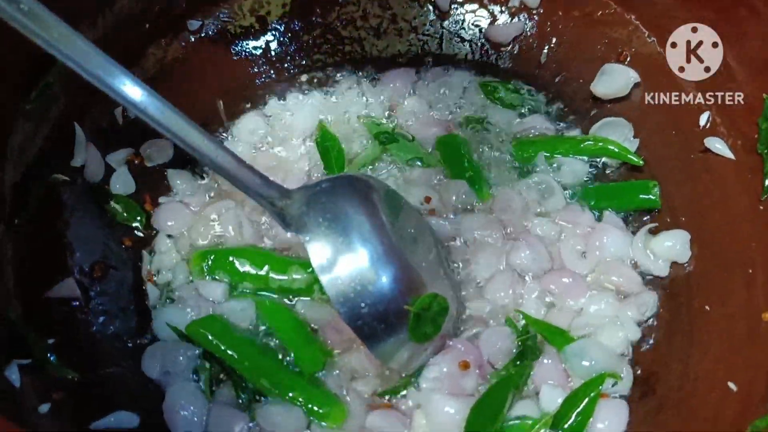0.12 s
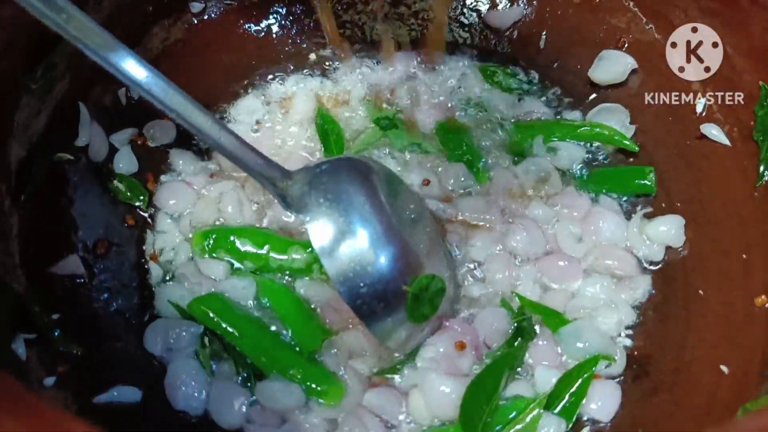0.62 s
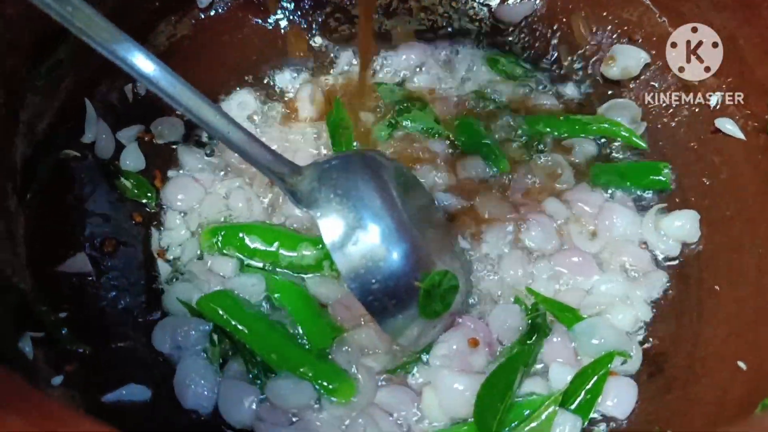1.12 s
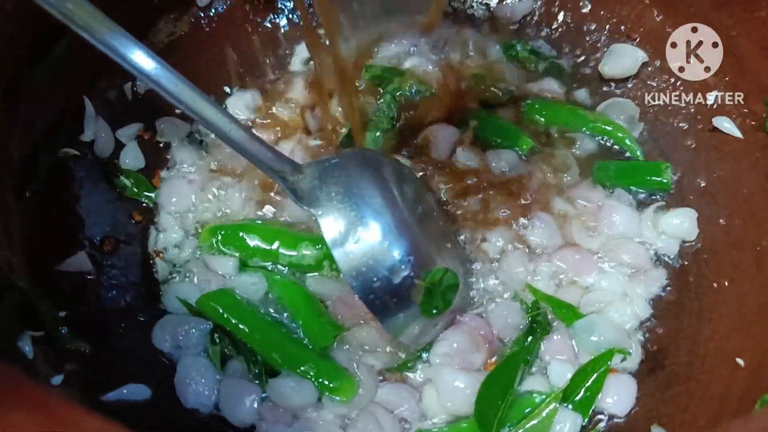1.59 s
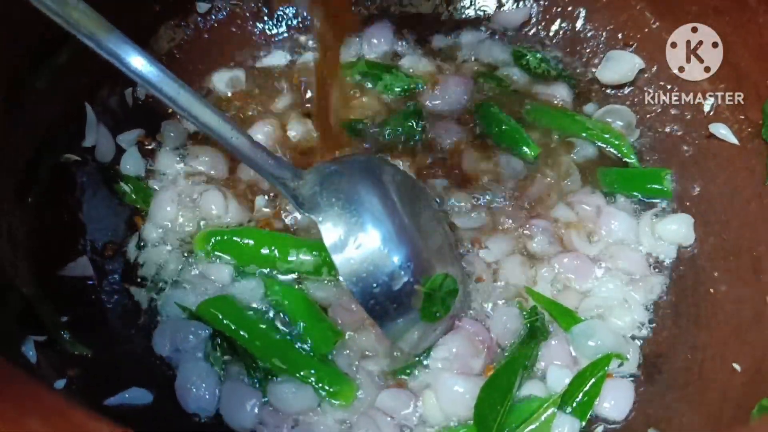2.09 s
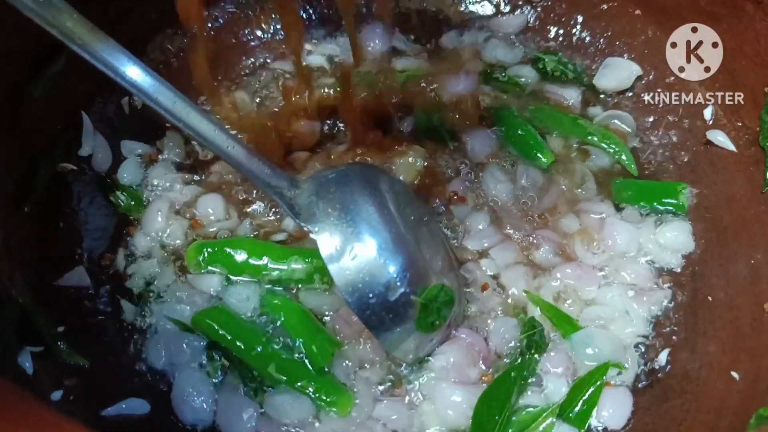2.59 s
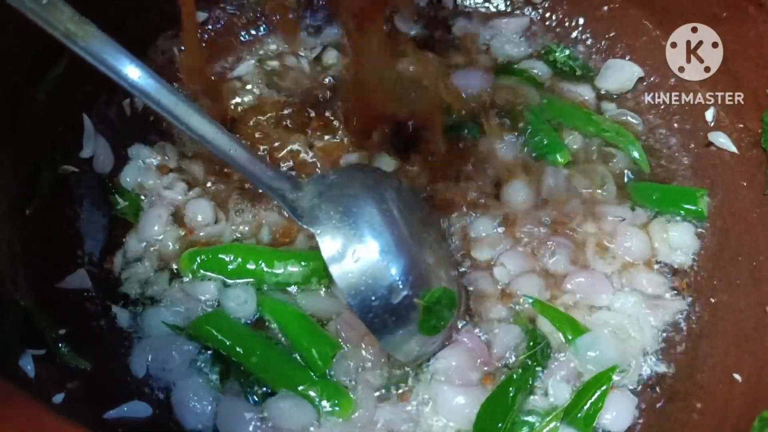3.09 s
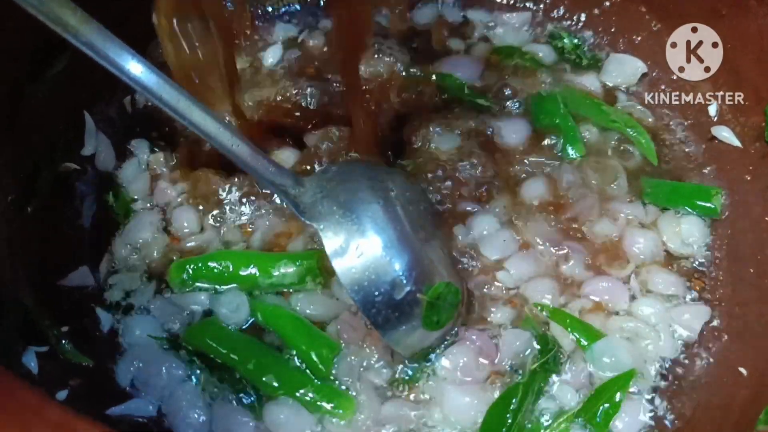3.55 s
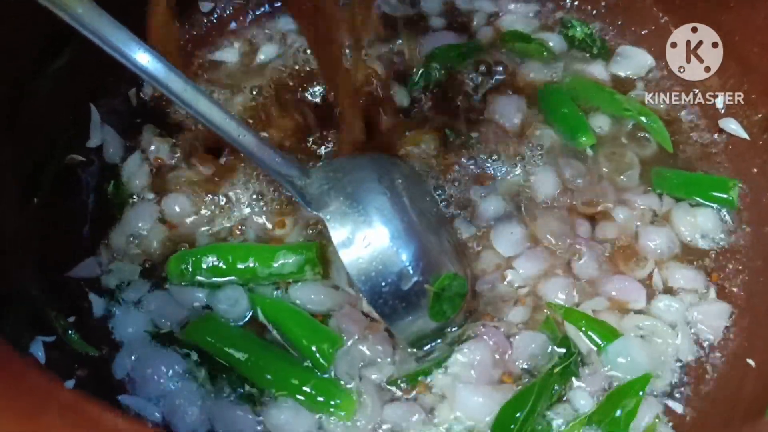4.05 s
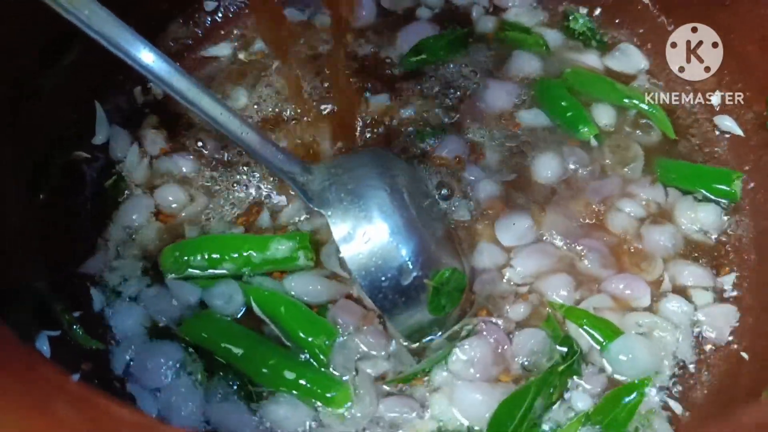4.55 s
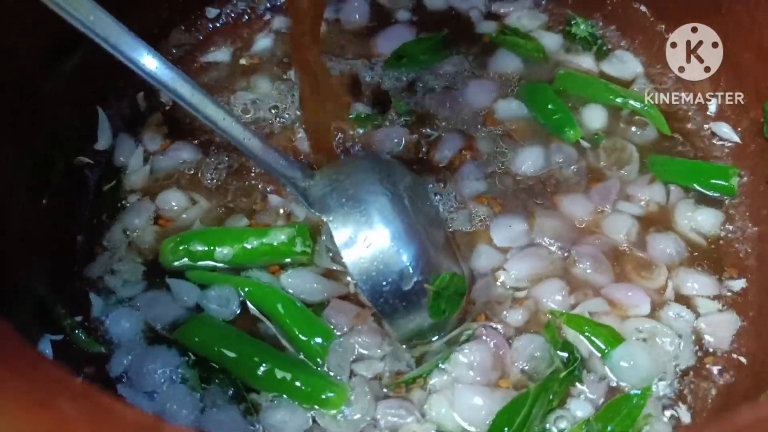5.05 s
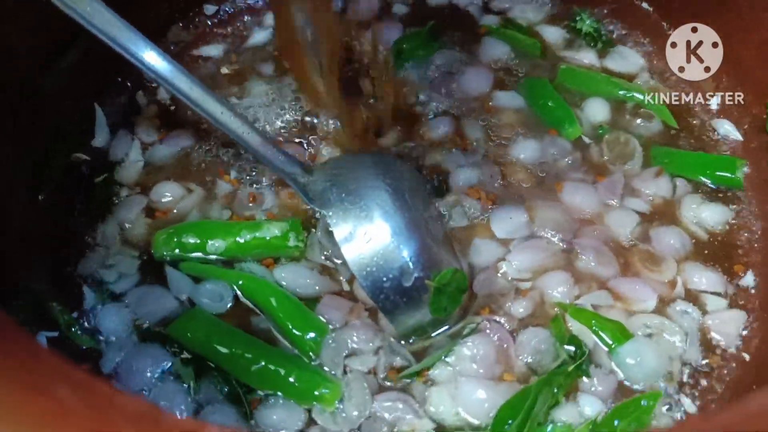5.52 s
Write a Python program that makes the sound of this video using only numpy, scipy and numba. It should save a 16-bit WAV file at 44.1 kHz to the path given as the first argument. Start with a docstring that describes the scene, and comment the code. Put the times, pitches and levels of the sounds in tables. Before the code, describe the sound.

Very close above a clay pot in a kitchen: a soft oil simmer ticks and crackles, then liquid hits the hot oil and flares into harsh, fluttering sizzle with snapping steam pops, many toward the left of no fixed spot but mostly right. Later, round bubbles plop with rising pitch inside the resonant pot. The crackle eases in the last second. Low room rumble with faint hums; phone sound, bright and slightly distorted on peaks.

```python
"""A soft simmer crackles, then juice is poured into hot oil with frying shallots in a clay pot.
Drops flash to steam: dense short grains crackle and spit, larger drops pop and puff, hiss fills in.
The air in the pot rings at its modes; as the pool deepens, big bubbles plop with a rising pitch.
A phone hears it just above the pot: each port adds its own treble resonances and loud bursts clip.
Under it all lies a room rumble with faint hums."""
import sys
import numpy as np
from scipy import signal
from scipy.fft import rfft, irfft, next_fast_len
from scipy.io import wavfile
from scipy.ndimage import uniform_filter1d
from numba import njit

SR = 44100
rng = np.random.default_rng(int(sys.argv[2]) if len(sys.argv) > 2 else 0)


def level_to_linear(level):
    """Convert decibel levels to linear amplitude factors, elementwise."""
    exponent = np.asarray(level, float) / 20
    return 10 ** exponent


def waveform_to_disk(signal):
    """Save audio, clipped to [-1, 1], as 16-bit WAV at the path in sys.argv[1]."""
    frames = np.transpose(np.atleast_2d(signal))
    scaled = np.clip(frames, -1, 1) * 32767
    samples = np.round(scaled).astype(np.int16)
    wavfile.write(sys.argv[1], SR, samples)


N = 249606

# Air modes of the pot. Each row: frequency in Hz, width in Hz, level in dB within its group of modes,
# left minus right in dB, likeness of the two ports from -1 to 1.
POT_MODES = [(490, 27, -4, 0, .98), (650, 60, -17, 0, .95), (1066, 72, -3.5, 1, .7),
             (1685, 45, -1.5, -4, -.4), (2050, 120, -11, 1, .1), (2295, 70, -2, -3, .3),
             (2690, 70, -10, 0, .5), (2875, 75, -3.5, -1, .2)]


def level(x, db):
    """Scale to an rms level in dB."""
    return x * level_to_linear(db) / np.sqrt(np.mean(x ** 2))


def walk(rate):
    """Random levels held for 1 / rate seconds and slewed twice; spread near 1."""
    hold = int(SR / rate)
    steps = np.repeat(rng.standard_normal(N // hold + 1), hold)
    slewed = uniform_filter1d(uniform_filter1d(steps, hold), hold)
    return 1.46 * slewed[:N]


def band(x, lo_hz, hi_hz):
    """Steep band-pass."""
    return signal.sosfilt(signal.butter(N=3, Wn=[lo_hz, hi_hz], btype="band", fs=SR, output="sos"), x)


@njit
def resonate(x, g, k):
    """State-variable band-pass loop; the centre may move every sample."""
    y, b, l = np.empty(len(x)), 0., 0.
    for i in range(len(x)):
        v = (b + g[i] * (x[i] + 1e-18 - l)) / (1 + g[i] * (g[i] + k))
        b, l, y[i] = 2 * v - b, l + 2 * g[i] * v, k * v
    return y


def svf(x, hz, width, shift=1.):
    """Resonance of gain 1 at its centre, which a factor near 1 may shift."""
    return resonate(x, np.tan(np.pi * hz / SR) * shift * np.ones(N), width / hz)


@njit
def grains(s, hz, cycles, size, rise, attack):
    """Each grain is a sine that swells, falls to 1/e in its cycles, and rises in pitch by a share meanwhile."""
    out = np.zeros(N)
    for k in range(len(s)):
        start, w = int(s[k] * SR), 2 * np.pi * hz[k] / SR
        span = cycles[k] * SR / hz[k]  # decay time in samples
        z, closed = size[k] * np.exp(1j * w * (start + 1 - s[k] * SR)), 1.
        p, glide = np.exp(1j * w - 1 / span), np.exp(1j * w * rise[k] / span)
        opening = np.exp(-1 / (attack * span))  # attack is a share of the decay time
        for i in range(max(start + 1, 0), min(start + int(6 * span) + 2, N)):
            closed *= opening
            out[i] += z.imag * (1 - closed)
            z, p = z * p, p * glide
    return out


def spatter(count, lo_hz, hi_hz, cycles, scatter_db, lag_ms, spread_ms, hiss_db):
    """Steam bubbles burst all over the pan: each has its own size, pitch, ring and path to either port."""
    t, pitch, strength, lag, side, ring = rng.random((count, 6)).T
    hz = lo_hz * (hi_hz / lo_hz) ** pitch
    turns = cycles * 6 ** (ring - .5)
    # a long ring spreads the same energy over more cycles
    size = level_to_linear(-scatter_db * np.log(1 - .999 * strength)) / np.sqrt(turns)
    lag_s = (lag_ms + spread_ms * (lag - .5)) / 1000
    heard = []
    for ear in (0, 1):  # left, then the lagging right
        ear_size = size * level_to_linear((ear - .5) * 13.0 * (side - .5))
        heard.append(grains(t * N / SR + ear * lag_s, hz, turns, ear_size, 0.024 + 0 * t, 0.35))
    # the countless smallest ones merge into hiss
    return level(np.array(heard), 0) + level_to_linear(hiss_db) * rng.standard_normal((2, N))


def ports(x):
    """The cavity behind each port rings at its resonances; the powers add and the response is causal."""
    # Each row: frequency in Hz, width in Hz, level in dB over the flat path.
    left_port = [(4000, 610, 3), (6480, 850, 7.5), (6800, 1560, 12), (10130, 1000, 5.5), (11850, 1200, 5)]
    right_port = [(3470, 650, 7.8), (4040, 285, 19.5), (4420, 710, 13.05), (5800, 480, 9.8),
                  (6260, 420, 18.5), (6680, 1770, 14.5), (7850, 740, 9.9)]
    hz, size, out = np.fft.rfftfreq(2048, 1 / SR), next_fast_len(N + 2048), []
    for v, table in zip(x, (left_port, right_port)):
        power = 1 + sum(level_to_linear(2 * db) / (1 + (2 * (hz - f) / w) ** 2) ** 1.42 for f, w, db in table)
        # folding the cepstrum gives the minimum-phase response
        cepstrum = irfft(np.log(power) / 2)
        fold = np.r_[cepstrum[0], 2 * cepstrum[1:1024], np.zeros(1024)]
        response = irfft(np.exp(rfft(fold)))
        out.append(irfft(rfft(v, size) * rfft(response, size), size)[:N])
    return np.array(out)


def sizzle(crackle_db, spit_db, pouring):
    """Crackle and fine spit flare up together as gouts of juice meet the oil."""
    # the flaring is weaker when no juice falls
    flare = (0.82 * walk(24.99) + 1.51 * walk(70)) * np.where(pouring, 1, 1 - 0.27)
    burst = ports(spatter(count=80000, lo_hz=3018, hi_hz=15590, cycles=4.8, scatter_db=3.5,
                          lag_ms=0.4677, spread_ms=0.14, hiss_db=-1.5))
    crackle = level(band(burst, 3160, 6840) * level_to_linear(flare), 2.66)
    # a gentle simmer makes only small bubbles, so the lower crackle is missing
    missing = 1 - level_to_linear(0.36 * np.clip(crackle_db + 23, -12, 0))
    lower = np.array([svf(v, 3900.0, 1200.0) for v in crackle])
    crackle = crackle - missing * lower
    spit = level(band(burst, 9130, 16700) * level_to_linear(0.55 * flare + 0.37 * walk(30)), 4.54)
    return level_to_linear(crackle_db) * crackle + level_to_linear(spit_db) * spit


def pops(crackle_db):
    """A larger drop explodes: a short ring and a broad tick, then a puff of steam hisses away."""
    # Loud steam pops. Each row: start in seconds, relative level in dB, pitch in Hz, left minus right in dB.
    loud_pops = [(0.062, -20, 6560, -7), (0.0835, -22, 4000, -17), (0.0886, -11, 6550, -8),
                 (0.156, -10.5, 6740, -5), (0.2209, -20.5, 5700, -15), (0.2898, -11, 6600, -19),
                 (0.3316, -14.5, 6700, -14), (0.455, -13.5, 6940, 5), (0.4754, -15, 7380, -10),
                 (0.4928, -13, 6700, -4), (0.6175, -23, 4930, -13), (0.65, -7.5, 6100, -6),
                 (0.7203, -18, 7900, 11), (0.8155, -6.5, 6440, -2), (0.834, -12, 5860, -12),
                 (0.8643, -4, 4280, -13), (0.9168, -8, 6430, -3), (0.9902, -11, 4280, -16),
                 (1.039, -6, 4100, -15), (1.0963, -2, 6800, -2), (1.182, -16, 3960, -17),
                 (1.2314, -2, 6430, -13), (1.3484, -2, 6250, -11), (1.3843, 0, 5900, -6),
                 (1.5255, -2, 6900, -9), (1.668, -2, 6700, -11), (1.6963, -1, 6200, -14),
                 (1.7552, 0, 6330, -9), (1.8836, -6, 4050, -23), (2.0865, 2, 6260, -6),
                 (2.1255, -4.5, 4080, -18), (2.1672, -4, 4150, -17), (2.302, 2, 6900, -12),
                 (2.3713, 0, 6340, -9), (2.4728, -1.5, 4030, -15), (2.598, 0, 5980, -12),
                 (2.6887, 3, 6550, -11), (2.7548, -4.5, 3960, -13), (3.003, -7, 6900, -5),
                 (3.1598, 0.5, 6540, -6), (3.4155, -2.5, 4010, -19), (3.4511, -1.5, 4100, -13),
                 (3.4955, -5, 6340, 7), (3.597, -3, 6260, -3), (3.7237, 2, 6240, -5),
                 (4.0067, -1.5, 4040, -15.5), (4.337, 3, 6500, 3), (4.485, 3, 6560, -1),
                 (4.576, -6, 4170, -16), (4.775, -8, 4260, -16), (4.942, -10, 7500, 0),
                 (5.095, -6, 6500, -8), (5.4136, -13, 4060, -14), (5.624, -11, 4230, -7)]
    # smaller pops come at random, at either of two pitches, and follow the crackle
    t, which, detune, weak, side = rng.random((60, 5)).T
    small_db = crackle_db[(t * N).astype(int)] + 11 - 9 * weak
    small_hz = np.array((4080, 6320))[(2 * which).astype(int)] * (1 + 0.023 * (detune - .5))
    small_pan_db = -9 + 12 * (side - .5)
    small = [t * N / SR, small_db, small_hz, small_pan_db]
    s, db, hz, pan_db = np.c_[np.transpose(loud_pops), small]
    sizes = [level_to_linear(db + 6.0 + way * pan_db / 2) for way in (1, -1)]
    # the ring reaches the left port 0.2 ms late
    ring = np.array([grains(s + lag, hz, 6.25 + 0 * s, size, 0 * s, .7)
                     for size, lag in zip(sizes, (.0002, 0.))])
    tick = level_to_linear(-17.5) * ports([grains(s, 9000 + 0 * s, 0.47 + 0 * s, size, 0 * s, 0.11) for size in sizes])
    tick = tick + level_to_linear(-8) * grains(s, 11500 + 0 * s, 1.8 + 0 * s, level_to_linear(db), 0 * s, 0.11)
    fade = np.exp(-1 / (0.007 * SR))  # 7 ms
    steam = signal.lfilter([1 - fade], [1, -fade], np.abs(ring))
    puff = steam * level(ports(rng.standard_normal((2, N))), 3.0)
    return band(ring + tick + puff, 3270, 15000)


def pot_air(ring_db, gurgle_db, pool, calm):
    """Bursts ring the air in the pot; the lowest modes follow the gurgling pool, the others the crackle."""
    drive, other = spatter(count=8000, lo_hz=415.4, hi_hz=4000, cycles=1.67, scatter_db=3,
                           lag_ms=4.5, spread_ms=9, hiss_db=9.5)
    t, pitch, strength = rng.random((260, 3)).T
    gurgle = grains(t * N / SR, 420 + 170 * pitch, 5 + 0 * t, level_to_linear(12 * strength), 0.025 + 0 * t, 1.0)
    wash = rng.standard_normal((2, N))
    low_wash = wash[0] + 0.24 * wash[1] * np.array([[1], [-1]])
    low = level_to_linear(-10.5) * band(low_wash, 310, 870) + level(gurgle, -18.0)
    high = level_to_linear(-4) * band(wash, 1200, 2700)
    for hz, width, db, pan_db, like in POT_MODES:
        # each mode is struck from ever-changing spots, so it swells on its own;
        # the upper modes ring less at a simmer
        swell = level_to_linear(2.05 * walk(12) - 4 * calm * (hz > POT_MODES[1][0]))
        # modes sink as the pool fills, the upper ones by up to 2.8 %
        shift = 1 - 0.028 * pool * min(hz / POT_MODES[5][0], 1) ** 3
        near, far = (swell * svf(v, hz, width, shift) for v in (drive, other))
        right = like * near + np.sqrt(1 - like ** 2) * far
        mode = level_to_linear(db) * np.array([near * level_to_linear(pan_db / 2), right * level_to_linear(-pan_db / 2)])
        if hz < 800:
            low = low + mode
        else:
            high = high + mode
    high = level(high, 3.32) * level_to_linear(ring_db + 1.7 * walk(20))
    low = level(low, -1.8) * level_to_linear(gurgle_db + walk(16))
    return high + low


def plops():
    """Big bubbles ring with a rising pitch and set off two strong air modes of the pot."""
    # Big bubbles. Each row: start in seconds, relative level in dB, starting pitch in Hz.
    big_bubbles = [(1.725, -9, 668), (2.039, -14.5, 555), (2.654, -23, 520), (2.878, -21, 507),
                   (3.351, -9, 640), (3.455, -15, 590), (3.492, -13, 570), (3.59, -23, 480),
                   (3.657, -16.5, 503), (3.696, -17.5, 490), (3.745, -21, 480), (3.784, -17.5, 480),
                   (3.814, -22, 480), (3.898, -9.5, 462), (3.951, -20, 487), (4.163, -13.5, 604),
                   (4.208, -21, 448), (4.258, -14.5, 490), (4.522, -21, 498), (4.6, -22, 490),
                   (4.688, -16.5, 483), (5.092, -16, 844), (5.163, -25, 447), (5.31, -8, 608),
                   (5.36, -21, 462), (5.422, -20, 460), (5.589, -22, 590), (5.627, -20, 537)]
    s, db, hz = np.transpose(big_bubbles)
    # smaller, higher bubbles ring for fewer cycles and rise more
    ratio = hz / 480
    bubble = grains(s, hz, 3.3 * (1 / ratio) ** 2.2, level_to_linear(db), 0.05 * ratio ** 2, 0.58)
    bubble = band(bubble, 300, 3000)
    low_mode = svf(bubble, POT_MODES[0][0], POT_MODES[0][1])
    upper_mode = svf(bubble, POT_MODES[2][0], POT_MODES[2][1])
    return 0.89 * bubble + level_to_linear(11) * low_mode + level_to_linear(14) * upper_mode


def kitchen(rumble_db):
    """Soft room rumble: shaped noise with resonant hums in it, mostly alike at both ports."""
    # Rumble spectrum. Each row: frequency in Hz, relative level in dB.
    rumble_curve = [(15, -47), (25, -13.5), (102, -9.5), (170, -7.5), (415, -4), (476, 1.5), (756, -5.5),
                    (913, -10), (1100, -14), (1260, -2.5), (1500, -30), (1950, -55), (3300, -120)]
    # Each row: frequency in Hz, width in Hz, gain in dB of the resonance added to the rumble.
    hums = [(178.7, 7.6, 4), (244.4, 9.8, 1.5), (287, 22, 3), (362.3, 10.3, 7)]
    hz, db = np.transpose(rumble_curve)
    bins_hz = np.maximum(np.fft.rfftfreq(N, 1 / SR), 1)
    gain = level_to_linear(np.interp(np.log(bins_hz), np.log(hz), db))
    mid, side = irfft(rfft(rng.standard_normal((2, N))) * gain, N)
    mid = mid + sum(level_to_linear(hum_db) * svf(mid, hum_hz, width) for hum_hz, width, hum_db in hums)
    return level(mid + 0.4 * side * np.array([[1], [-1]]), 6.3) * level_to_linear(rumble_db)


def scene():
    """Everything in and around the pot: simmer, pour, and the calmer frying after."""
    # How fiercely the oil crackles: simmer, first splash, full pour, calmer frying.
    # Each row: time in seconds, relative level in dB.
    crackle_curve = [(0, -35.5), (0.795, -34.5), (0.81, -27.5), (1.0, -25.5), (1.05, -22), (1.3, -19),
                     (1.75, -17), (2.3, -18.5), (2.75, -16.5), (3.0, -18), (3.9, -18.5), (4.81, -19.5),
                     (4.85, -23.5), (5.66, -23)]
    # Low gurgle in the pool. Each row: time in seconds, relative level in dB.
    gurgle_curve = [(0, -49.5), (1.4, -40), (1.75, -37), (2.3, -43.5), (2.85, -38), (3.25, -42),
                    (3.55, -33), (3.85, -31), (4.0, -38), (4.25, -28), (4.5, -36.5), (5.05, -35.5),
                    (5.45, -31), (5.66, -37)]
    t = np.arange(N) / SR
    crackle_db = np.interp(t, *np.transpose(crackle_curve))
    gurgle_db = np.interp(t, *np.transpose(gurgle_curve))
    pour_s, full_s = .8, 5.37  # the pool deepens evenly between these times
    pool = np.clip((t - pour_s) / (full_s - pour_s), 0, 1)
    pouring = (pool > 0) & (pool < 1)
    rise = crackle_db + 36  # dB over a simmer
    calm = np.clip(1 - rise / 15, 0, 1)
    # fine spit lies under the crackle; a filling pool dulls it further
    spit_db = crackle_db + np.where(pool > 0, -4.5 - 5 * pool, -7.5)
    # the pot ring takes a share of the crackle's rise and gains as the pool fills
    ring_db = -43.5 + 0.51 * rise + 6 * pool
    # the rumble slowly sinks as the frying grows
    lag = np.exp(-1 / (0.53 * SR))  # 0.53 s
    rumble_db = -46.5 - 0.23 * signal.lfilter([1 - lag], [1, -lag], rise)
    frying = sizzle(crackle_db, spit_db, pouring) + pops(crackle_db)
    pot = pot_air(ring_db, gurgle_db, pool, calm) + plops()
    return frying + pot + kitchen(rumble_db)


def band_limit(x):
    """A steep low-pass at the top of the band."""
    return signal.sosfilt(signal.butter(12, 15680, fs=SR, output="sos"), x)


def record(dry):
    """The phone cuts the top and clips the loudest bursts."""
    cut = signal.sosfilt(signal.ellip(8, .2, 50, 15450, fs=SR, output="sos"), dry)
    return band_limit(np.clip(cut, -1, 1))


dry = scene()
out = record(dry)
waveform_to_disk(out)
```